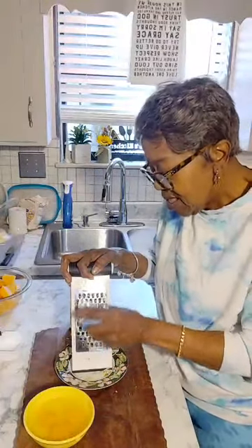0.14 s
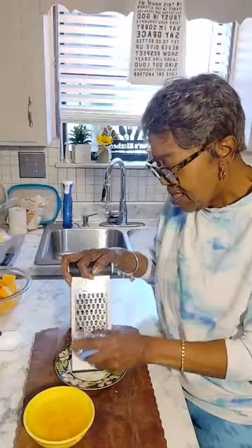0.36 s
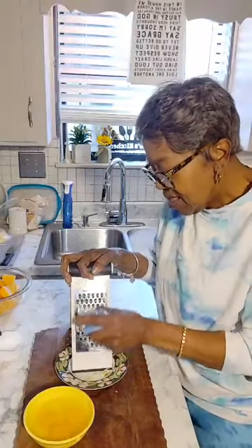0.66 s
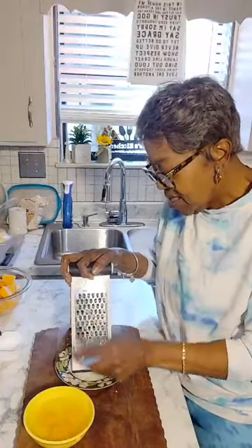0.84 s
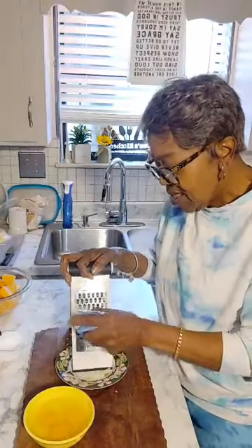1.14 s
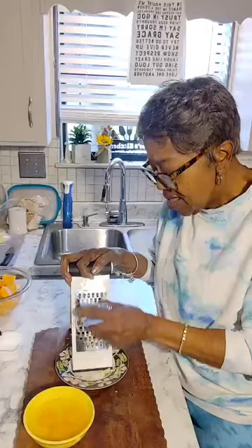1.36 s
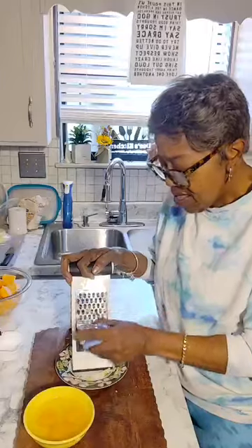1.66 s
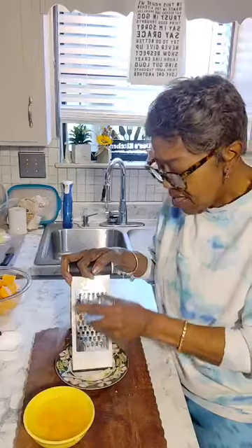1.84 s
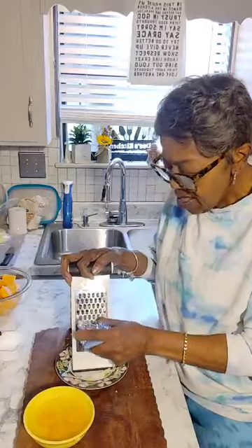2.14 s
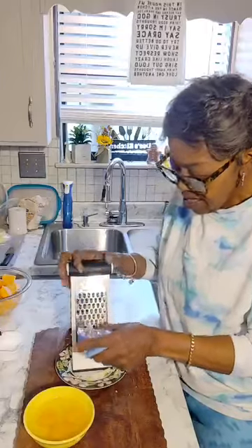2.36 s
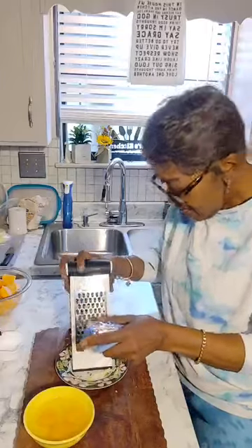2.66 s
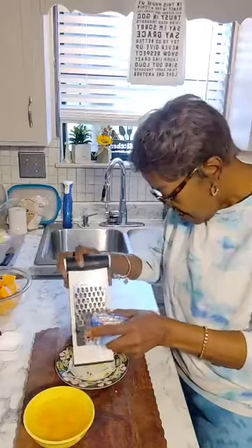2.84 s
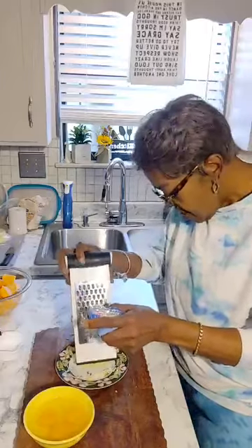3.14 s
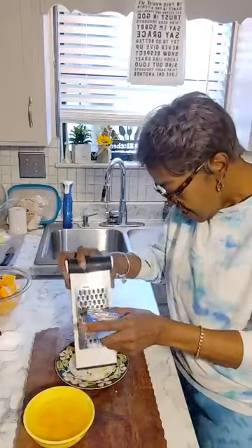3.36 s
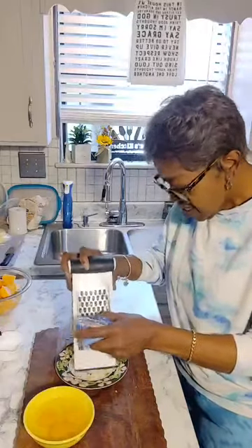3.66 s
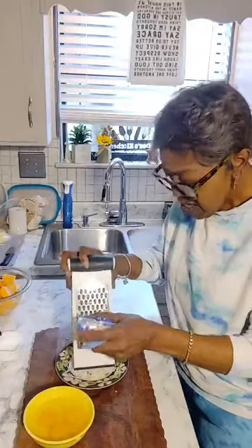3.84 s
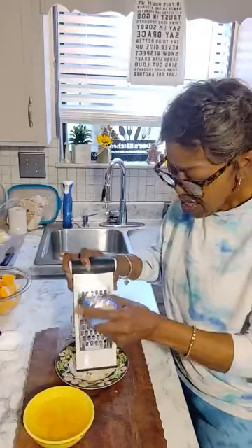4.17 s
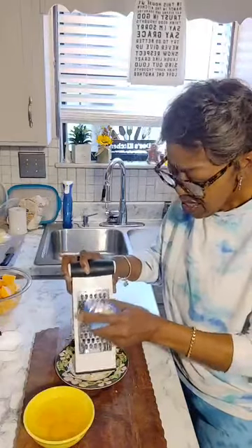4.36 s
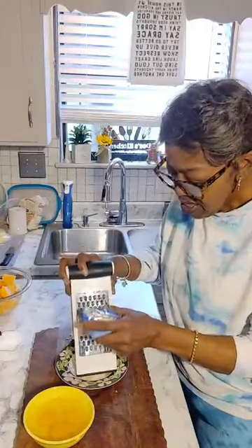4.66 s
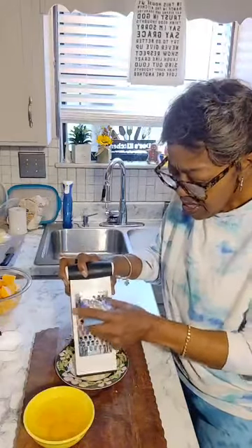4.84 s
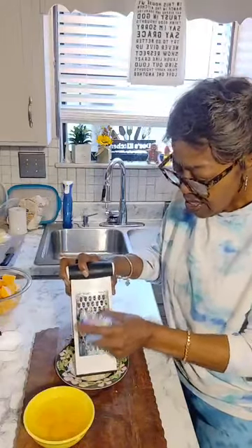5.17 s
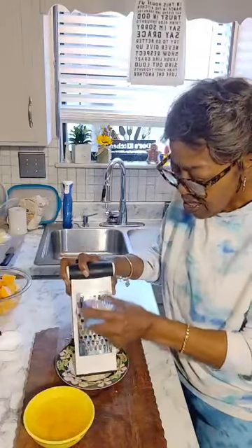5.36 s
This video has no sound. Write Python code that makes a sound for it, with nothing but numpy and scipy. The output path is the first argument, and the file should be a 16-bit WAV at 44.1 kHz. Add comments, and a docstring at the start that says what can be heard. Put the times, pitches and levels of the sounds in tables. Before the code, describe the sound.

In a small hard kitchen, a firm block is rubbed on a steel grater in short, gritty rasps with sharp snaps. Around one second the grater bangs on a china plate in a quick loud clatter with a brief damped ring. More strokes follow, then a pause, a group of lighter knocks near four seconds, and faint last scrapes. Close phone pickup, softened highs, short room tail, quiet hum.

```python
"""A wrapped block of cheese is pushed over a steel box grater standing on a china plate in a kitchen, 5.5 s.
0-1.1 s: strokes rasp (dense grains) and rumble (low noise), with snaps (smeared clicks) as teeth catch; about
1.1 s the grater knocks on the plate and both ring (decaying modes). 1.6-2.8 s: more strokes; 2.9 s: a light
knock; 3.8-4.3 s: strokes amid knocks; 4.9-5.5 s: last strokes. Throughout, air noise, a faint appliance hum
(sines) and rustling (sparse ticks); the phone's noise suppressor shortens the room's tail."""
import sys
import numpy as np
from scipy import signal
from scipy.fft import rfft, irfft
from scipy.io import wavfile
from scipy.ndimage import uniform_filter1d

SR = 44100
rng = np.random.default_rng(int(sys.argv[2]) if len(sys.argv) > 2 else 0)


def to_wav(s):
    """Save 16-bit WAV."""
    ch = np.atleast_2d(s).T  # columns
    pcm = np.round(np.clip(ch, -1, 1) * 32767)  # PCM
    wavfile.write(sys.argv[1], SR, pcm.astype(np.int16))


N = 242991
T = np.arange(N) / SR  # scene time, s
AGE = T[:16384]  # time since an event's onset, s
BODY_PER_BITE, FULL_PER_BITE = 0.56, 0.51  # dB of low and middle tones per dB of bite


def undb(db):
    """Decibels to gain."""
    return 10 ** (np.asarray(db) / 20)


def unit(x):
    """Scale to rms 1."""
    return x / np.sqrt(np.mean(x ** 2))


def add(out, start_s, x):
    """Mix x into out from start_s, cut at the end of out."""
    i = int(start_s * SR)
    out[i:i + len(x)] += x[:len(out) - i]


def bell(hz, centre_hz, octaves):
    """A hump of height 1 on the log-frequency axis."""
    return np.exp(-(np.log2(hz / centre_hz) / octaves) ** 2)


def colour(x, points, humps=()):
    """Minimum-phase filter of unit mean power gain from (Hz, dB) points and (Hz, octaves, dB) humps."""
    size = 2 ** 11
    hz = np.maximum(np.arange(size // 2 + 1) * SR / size, 1)
    at_hz, point_db = np.transpose(points)
    gain_db = np.interp(np.log(hz), np.log(at_hz), point_db)
    for centre_hz, octaves, height_db in humps:
        gain_db = gain_db + height_db * bell(hz, centre_hz, octaves)
    # folding the cepstrum makes the filter causal
    cepstrum = irfft(np.log(unit(undb(gain_db))))
    cepstrum[1:size // 2] *= 2
    cepstrum[size // 2 + 1:] = 0
    response = irfft(np.exp(rfft(cepstrum)))
    return signal.fftconvolve(x, response)[:len(x)]


def grains(count, spread_db):
    """Dense tiny clicks of unequal size, rms 1."""
    sizes = undb(spread_db * np.minimum(rng.exponential(size=count), 4))
    return unit(rng.standard_normal(count) * sizes)


def burst(fade_s, spread_db):
    """Grains that die away; the first moments have rms near 1."""
    fade = np.exp(-(AGE / fade_s) ** (3 / 2))
    fade_rms = np.sqrt(np.mean(fade ** 2))
    return unit(grains(len(AGE), spread_db) * fade) * fade_rms


def click(smear_s):
    """A pulse of near unit energy that has run through sheet steel: high bending waves arrive first."""
    hz = np.arange(len(AGE) // 2 + 1) * SR / len(AGE)
    # group delay is zero at the Nyquist frequency and smear_s at a quarter of it
    turns = smear_s * (2 * np.sqrt(hz * SR / 2) - hz)
    return irfft(np.exp(-2j * np.pi * turns)) * (1 - AGE / AGE[-1]) ** 2


# colour of teeth on the block: (frequency [Hz], density [dB per Hz])
TOOTH_COLOUR = [(100, -31.5), (500, -11), (1200, -10), (1700, -10.5), (3000, -1.5), (4800, -1), (6200, 2),
                (7500, -5.5), (9000, -8), (12000, -10), (16000, -14.5)]
# colour of the shaken grater and worktop: (frequency [Hz], density [dB per Hz])
RUMBLE_COLOUR = [(30, -28.5), (65, -20.5), (95, -1), (170, -4), (260, -7), (340, -17.5), (600, -15),
                 (1500, -33.5), (5000, -66)]
# the block slides over the teeth; bite is how deep they cut:
# (start [s], hold [s], rasp level [dB], rasp pitch [Hz], bite [dB])
STROKES = [(.035, 0.045, -38.5, 5800, 4.5), (0.33, .068, -29, 3700, -2), (0.597, 0.062, -26.5, 5900, -1),
           (0.787, .04, -54, 4400, 1.5), (0.84, 0.039, -29, 3300, 2.5), (1.011, .022, -42, 6000, 0.5),
           (1.035, 0.054, -25, 6000, 7), (1.579, .022, -33.5, 5700, -0.5), (1.941, 0.03, -31.5, 3700, -1),
           (2.077, 0.038, -31, 5000, 1.5), (2.426, 0.071, -30, 5900, -1.5),
           (2.503, 0.053, -29.5, 3560, -3.5), (2.655, .025, -40, 6000, -8.5),
           (2.707, .055, -27.5, 5500, -17.5), (2.755, 0.03, -29, 2030, -5.5), (3.82, 0.12, -33, 3500, -0.5),
           (4.082, .026, -33.5, 3400, 2.5), (4.903, 0.035, -49.5, 3370, 10.5),
           (4.984, 0.14, -37.5, 5800, 2.5), (5.251, 0.16, -55, 6200, 0), (5.442, 0.039, -35.5, 5700, -1.5)]


def push_envelope(hold_s, attack_s=0.0081, release_s=0.014, sag_db_per_s=45):
    """A push sets in, eases as the arm extends, then lets go."""
    attack = np.minimum(AGE / attack_s, 1)
    sag = undb(-sag_db_per_s * AGE)
    release = np.exp(-np.maximum(AGE - hold_s, 0) / release_s)
    return attack * sag * release


def strokes(pitch_db=4, catch_db=3, body_db=-1, teeth_per_s=110, teeth_db=-6.5, drag_lag_s=.012, drag_db=-16):
    """Teeth shave the block in a dense, uneven rasp while its drag shakes the grater and the worktop."""
    out = np.zeros(N)
    for start_s, hold_s, rasp_db, hz, bite_db in STROKES:
        push = push_envelope(hold_s)
        # the shavings tear in fits a few milliseconds long
        fits = unit(uniform_filter1d(rng.standard_normal(len(AGE)), size=130))
        shaving = unit(undb(catch_db * fits)) * grains(len(AGE), spread_db=5.5)
        # single teeth tick through the rasp
        ticks = rng.standard_normal(len(AGE)) * (rng.random(len(AGE)) < teeth_per_s / SR)
        ticks = unit(signal.fftconvolve(ticks, click(smear_s=.0006))[:len(AGE)])
        # the teeth under the block resonate above the rest of the rasp, wherever their pitch lies
        rise_db = pitch_db - np.interp(hz, *np.transpose(TOOTH_COLOUR))
        humps = [(hz, .35, rise_db), (850, 1.2, body_db + BODY_PER_BITE * bite_db)]
        rasp = colour(push * (shaving + undb(teeth_db) * ticks), TOOTH_COLOUR, humps)
        # the grater's rumble lags the push
        keep = np.exp(-1 / (drag_lag_s * SR))
        drag = signal.lfilter([1 - keep], [1, -keep], push)
        rumble = colour(drag * rng.standard_normal(len(AGE)), RUMBLE_COLOUR)
        add(out, start_s, undb(rasp_db) * (rasp + undb(drag_db + bite_db) * rumble))
    return out


# a tooth catches and lets go: (time [s], level [dB], pitch [Hz])
SNAPS = [(0.01, -26, 5800), (0.0601, -18.5, 6300), (0.2189, -24.5, 6200), (0.2538, -24.5, 3930),
         (0.334, -10.5, 3870), (0.3897, -14, 3500), (0.5318, -28.5, 2270), (0.598, -13.5, 6156),
         (0.625, -9, 6310), (0.843, -15, 5147), (0.8597, -16.5, 6320), (1.044, -13.5, 4216),
         (1.0595, 1.5, 5930), (1.5814, -21.5, 5890), (1.8573, -28.5, 5650), (1.949, -14, 5880),
         (2.0815, -19, 4890), (2.094, -11, 6040), (2.4279, -6.5, 6310), (2.4515, -19.5, 6070),
         (2.5085, -7.5, 6590), (2.5368, -8, 5850), (2.6803, -10.5, 6130), (2.7027, 0.5, 5850),
         (2.7262, -9, 6140), (2.77, -7.5, 5800), (3.1614, -20, 5840), (3.593, -30.5, 5650),
         (3.834, -5.5, 4460), (4.0996, -23, 6250), (4.3542, -19, 5780), (4.9781, -27, 6100),
         (5.0478, -12, 5450), (5.4531, -20, 6350)]


def snaps(click_db=6, crackle_db=-15, crackle_s=0.018, pitch_db=6, full_db=-1, body_db=-1,
          usual_db=-22.5, thinning=0.9):
    """A sharp click, then a crackle of smaller tears; fuller where the stroke bites deep, brighter when loud."""
    out = np.zeros(N)
    start_s, hold_s, _, _, bites_db = np.transpose(STROKES)
    for time_s, level_db, hz in SNAPS:
        nearest = np.argmin(np.abs(start_s + hold_s / 2 - time_s))
        bite_db = bites_db[nearest]
        # dB of body lost as a snap is louder than usual
        thin_db = thinning * (level_db - usual_db)
        crackle = undb(crackle_db) * burst(crackle_s, spread_db=6)
        tear = undb(click_db) * click(smear_s=0.00058) + crackle
        humps = [(hz, .22, pitch_db),
                 (2500, .7, full_db + FULL_PER_BITE * bite_db),
                 (700, 1.4, body_db + BODY_PER_BITE * bite_db - thin_db),
                 (16000, 0.09, -2.5)]  # a narrow dip at the very top
        add(out, time_s, undb(level_db) * colour(tear, TOOTH_COLOUR, humps))
    return out


# colour of the rim on the plate: (frequency [Hz], density [dB per Hz])
CLACK_COLOUR = [(60, -43.5), (200, -25), (480, -12), (620, -15), (820, -2.5), (1500, -4.5), (2500, -4),
                (4500, -9.5), (6500, -11), (9000, -24.5), (16000, -33)]
# modes of the grater's sheet steel: (frequency [Hz], level [dB])
STEEL_MODES = [(155, -8), (242, -4.5), (266, -6), (515, -5.5), (535, -4), (745, -0.5), (797, -3.5),
               (863, -1), (985, -9.5), (1034, -6.5), (1186, 2.5), (1221, -7), (1275, -1.5), (1513, -5),
               (1560, -9.5), (1752, -7.5), (1804, -3.5), (2046, -8), (2293, -14.5)]
# modes of the china plate: (frequency [Hz], level [dB])
CHINA_MODES = [(1445, -16.5), (2888, -1), (2905, -8), (4319, -4.5), (4371, -11), (5755, -11), (5800, -6.5),
               (5855, -2.5), (7385, -10.5)]
# the grater lands on the plate: (time [s], clack level [dB], weight behind it [dB], hardness [dB],
# china ring level [dB], favoured china pitch [Hz])
KNOCKS = [(0.389, -25.5, -12, -4, -40, 4360), (1.044, -10.5, -4, -7.5, -34, 4300),
          (1.06, -10.5, 11, -0.5, -20.5, 5936), (1.102, -3, 3, -5.5, -27, 2897),
          (1.107, -2.5, 5.5, -5, -23, 2780), (1.125, -11, 11, -2, -21.5, 5863),
          (2.9224, -16, -19, -1, -72, 2930), (3.784, -17.5, -0.5, -7.5, -50, 3090),
          (3.809, -17.5, 1.5, -1.5, -43.5, 5600), (3.913, -10, -4.5, 0.5, -16.5, 4470),
          (3.955, -9.5, -10, 5.5, -26, 6100), (4.001, -22, -5.5, -3, -33, 2840),
          (4.212, -20, -2, 6.5, -31, 4450), (4.254, -24.5, -0.5, 2, -40.5, 2900)]


def knocks(favour_db=11, steel_t60_s=0.44, china_t60_s=.55, chatter_db=-18.0, chatter_dull_db=-4,
           clack_hz=1000, octaves_per_db=0.05, settle_s=.033, ring_s=.085, thump_db=-33, steel_db=-30):
    """The rim clacks and chatters on the plate and the worktop thumps; returns the blows and the ringing."""
    blows, rings = np.zeros(N), np.zeros(N)
    for time_s, clack_db, weight_db, hard_db, china_db, china_hz in KNOCKS:
        landing_db = clack_db + weight_db
        # the more weight, the higher the clack
        hz = clack_hz * 2 ** (octaves_per_db * weight_db)
        contact = undb(6.5) * click(smear_s=0.0005006) + undb(-10.5) * burst(0.0035, spread_db=6.0)
        clack = colour(contact, CLACK_COLOUR, [(hz, .5, 8), (5000, 1.3, hard_db)])
        add(blows, time_s, undb(clack_db) * clack)
        # the heavier the landing, the longer the grater chatters, more softly than it struck
        linger = 2 ** ((landing_db + 19.0) / 15)
        humps = [(hz, .8, 2), (480, .5, 7), (4000, 1.3, hard_db + chatter_dull_db)]
        chatter = colour(burst(settle_s * linger, spread_db=3.0), CLACK_COLOUR, humps)
        add(blows, time_s, undb(clack_db + chatter_db) * chatter)
        thump = colour(burst(0.025, spread_db=-2.5), RUMBLE_COLOUR, [(480, 0.89, 13.5), (50.82, 0.92, -6.5)])
        add(blows, time_s, undb(landing_db + thump_db) * thump)
        # the point of contact decides which of the plate's modes speaks most
        mode_hz = np.array(CHINA_MODES)[:, 0]
        favour = favour_db * (bell(mode_hz, china_hz, 0.54) - 1)
        damped_s = ring_s * linger ** 1.1
        add(rings, time_s, undb(landing_db + steel_db) * ring(STEEL_MODES, steel_t60_s, damped_s))
        add(rings, time_s, undb(china_db) * ring(CHINA_MODES, china_t60_s, damped_s, favour))
    return blows, rings


def ring(modes, free_t60_s, damped_s, favour_db=0, buzz=0.44, wander_hz=40):
    """Decaying modes, wavering as the loose rim chatters on the plate, until the hand's pressure stills them."""
    hz, db = np.transpose(modes)
    shape = (len(hz), len(AGE))
    waver = 1 + buzz * unit(uniform_filter1d(rng.random(shape) - .5, size=250))
    # the shifting contact detunes the high modes most: wander_hz rms at the highest china mode
    wander = unit(uniform_filter1d(rng.random(shape) - .5, size=300))
    detune_hz = wander_hz * (hz / CHINA_MODES[-1][0])[:, None] * wander
    cycles = np.cumsum(hz[:, None] + detune_hz, axis=1) / SR + rng.random((len(hz), 1))
    tones = np.sin((2 * np.pi * cycles).astype(np.float32))
    fade = np.exp(-np.log(1000) * AGE / free_t60_s - (AGE / damped_s) ** 2)
    return np.sum(undb(db + favour_db)[:, None] * waver * tones, axis=0) * fade


def kitchen(x, t60_s=.27, build_s=0.014):
    """Dense echoes of a small hard room build up, then decay exponentially."""
    fade = np.exp(-np.log(1000) * AGE / t60_s)
    echoes = grains(len(AGE), spread_db=5.0) * (1 - np.exp(-AGE / build_s)) * fade
    # the echoes carry little bass; low tones stay mostly direct
    high_pass = signal.butter(2, 230, "high", fs=SR, output="sos")
    echoes = signal.sosfilt(high_pass, echoes)
    return signal.fftconvolve(x, echoes / np.linalg.norm(echoes))[:N]


# colour of the room air: (frequency [Hz], density [dB per Hz])
AIR_COLOUR = [(20, -21), (70, -17.5), (115, -9.5), (200, -7.5), (350, -9.5), (600, -13), (900, -13),
              (2500, -15), (4500, -14.5), (6300, -15), (9000, -21), (16000, -12.5)]
# appliance hum: (frequency [Hz], rms level [dB])
HUM = [(113, -73), (177.6, -73.5), (269.2, -72), (394, -82), (452.2, -77), (511.4, -71.5), (623.5, -70),
       (683.7, -76.5)]


def background(air_db=-52.5, rustle_db=-66, rustles_per_s=60):
    """Steady room air (noise), an appliance's hum (sines) and faint rustling in the hand (sparse ticks)."""
    air = colour(rng.standard_normal(N), AIR_COLOUR)
    hum = np.zeros(N)
    for hz, db in HUM:
        hum += np.sqrt(2) * undb(db) * np.sin(2 * np.pi * (hz * T + rng.random()))
    ticks = rng.standard_normal(N) * (rng.random(N) < rustles_per_s / SR)
    rustle = colour(unit(ticks), TOOTH_COLOUR)
    return undb(air_db) * air + hum + undb(rustle_db) * (rustle + kitchen(rustle))


def scene(room_db=-6.0, ring_to_room_db=-24.5):
    """Grating and knocks, heard across the worktop."""
    blows, rings = knocks()
    near = strokes() + snaps() + blows
    room = kitchen(near + undb(ring_to_room_db) * rings)
    return (near + rings + undb(room_db) * room + background())[None]


def suppress(x, threshold_db=-40, depth_db=-14, memory=0.83, echo_db=-7, slope=1.5):
    """Noise suppressor: each band is turned down as it sinks towards the hiss or the echo of its own past."""
    size = 512
    overlap = size * 3 // 4
    bands = signal.stft(x, nperseg=size, noverlap=overlap)[2]
    power = uniform_filter1d(np.abs(bands) ** 2 * size, size=9, axis=-2)
    power = np.abs(uniform_filter1d(power, size=5, axis=-1))
    # the expected echo is the power of some 55 ms (19 frames) ago, slowly forgotten
    echo = signal.lfilter(np.r_[np.zeros(19), 1 - memory], [1, -memory], power)
    floor = undb(threshold_db) ** 2 + undb(echo_db) ** 2 * echo
    excess = (power / floor) ** slope
    gain = (undb(depth_db) + excess) / (1 + excess)
    return signal.istft(bands * gain, nperseg=size, noverlap=overlap)[1][..., :N]


def record(dry, speech_hz=7350, top_db=-14, top_hz=15900):
    """The phone suppresses noise, plays everything above the speech band softer and cuts the top."""
    x = suppress(dry)
    speech = signal.sosfiltfilt(signal.butter(14, speech_hz, fs=SR, output="sos"), x)
    x = np.clip(speech + undb(top_db) * (x - speech), -1, 1)
    return signal.sosfilt(signal.ellip(8, .2, 70, top_hz, fs=SR, output="sos"), x)


dry = scene()
out = record(dry)
to_wav(out)
```